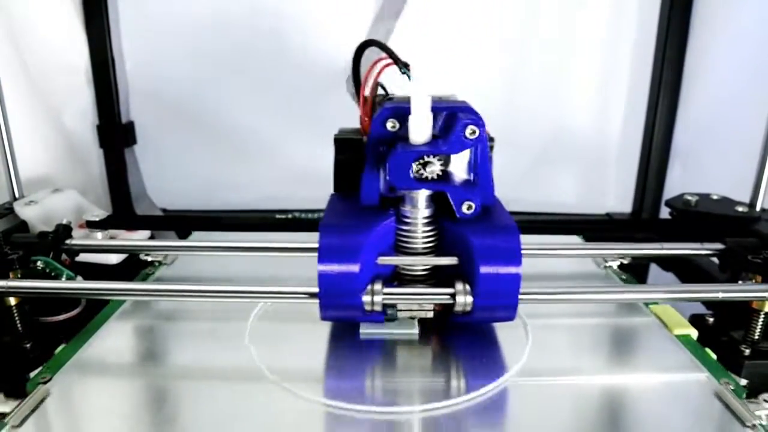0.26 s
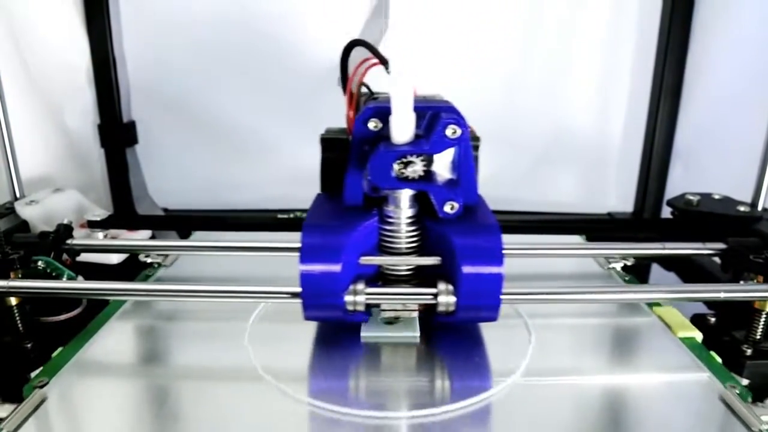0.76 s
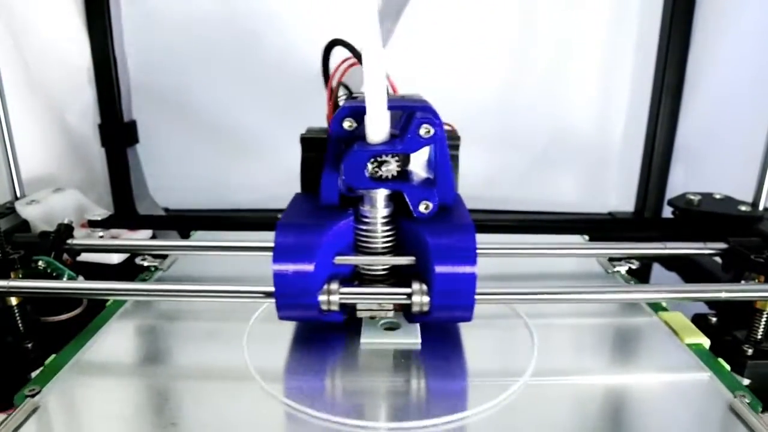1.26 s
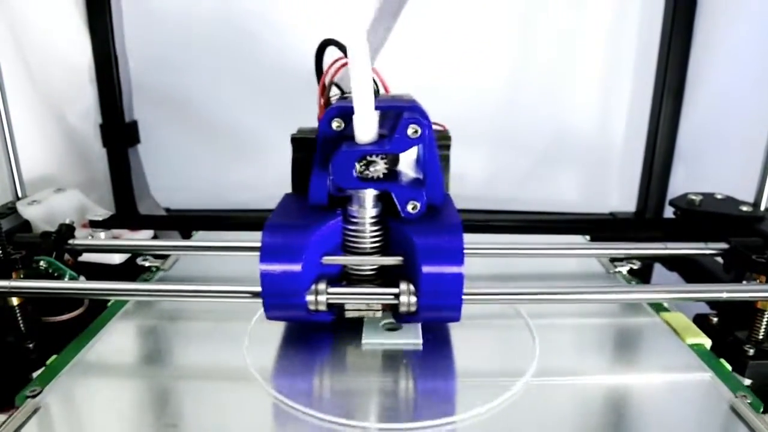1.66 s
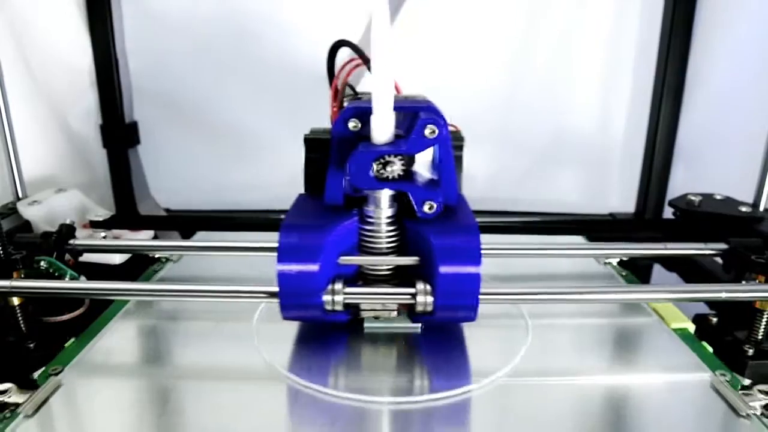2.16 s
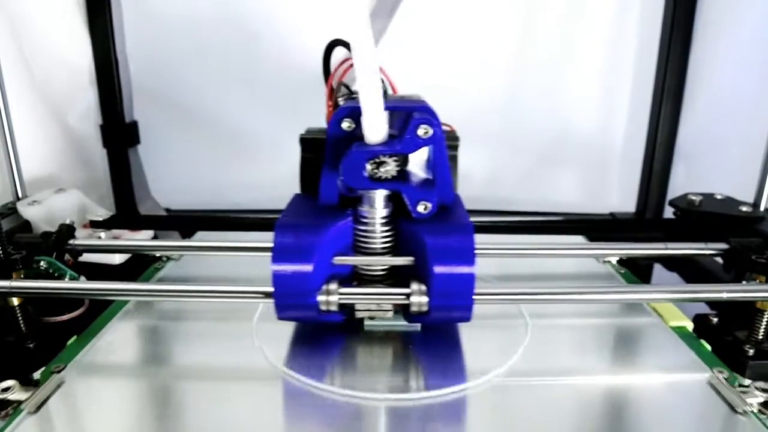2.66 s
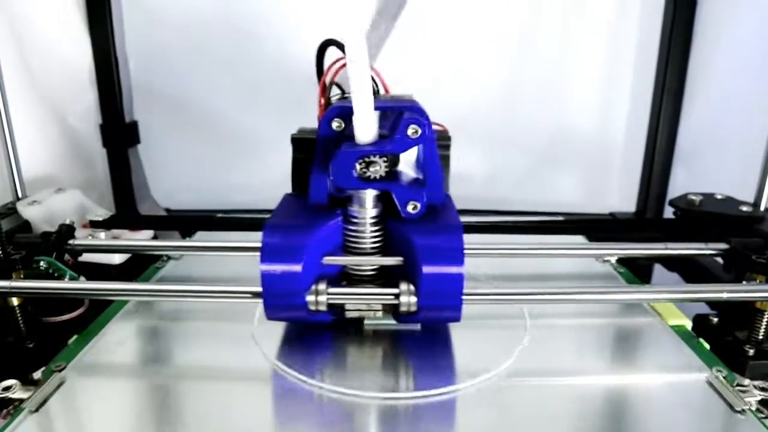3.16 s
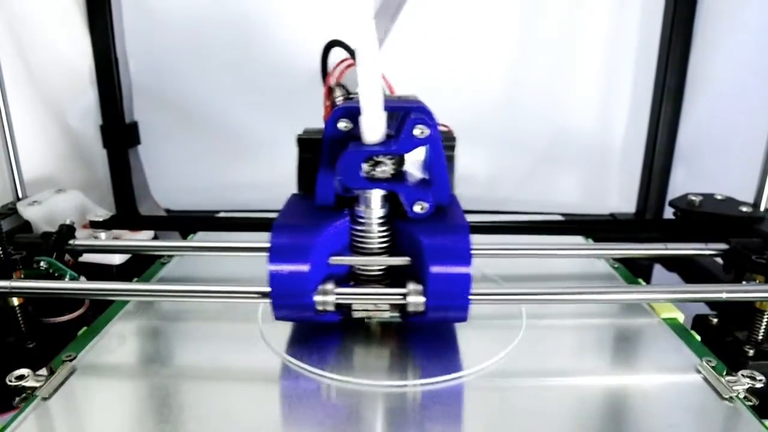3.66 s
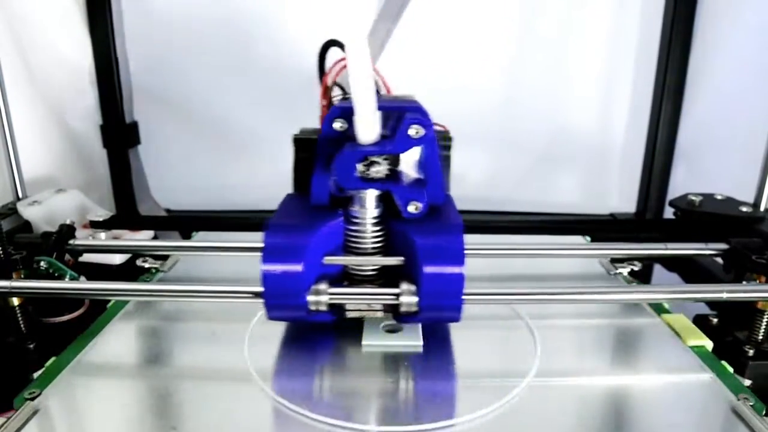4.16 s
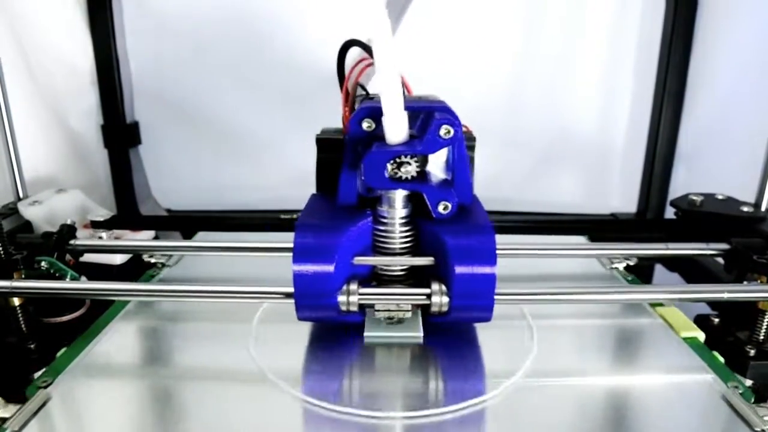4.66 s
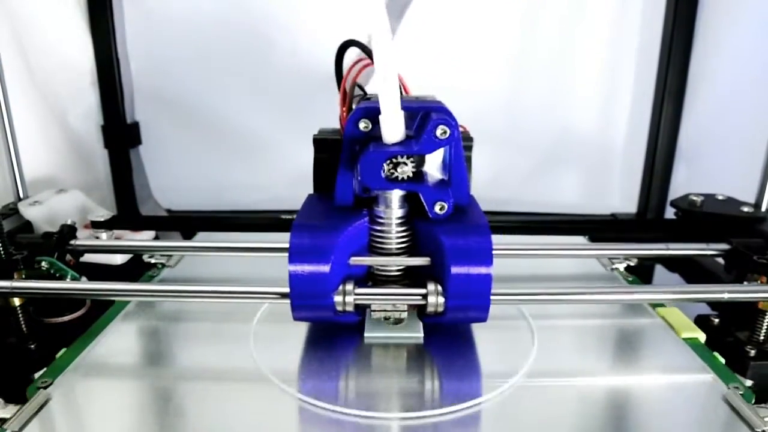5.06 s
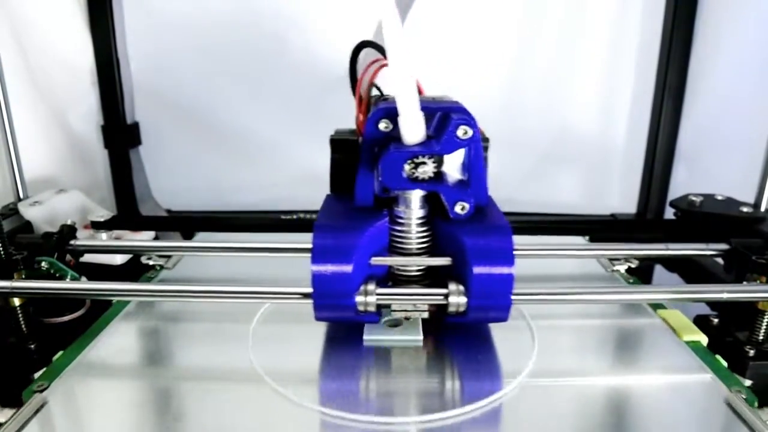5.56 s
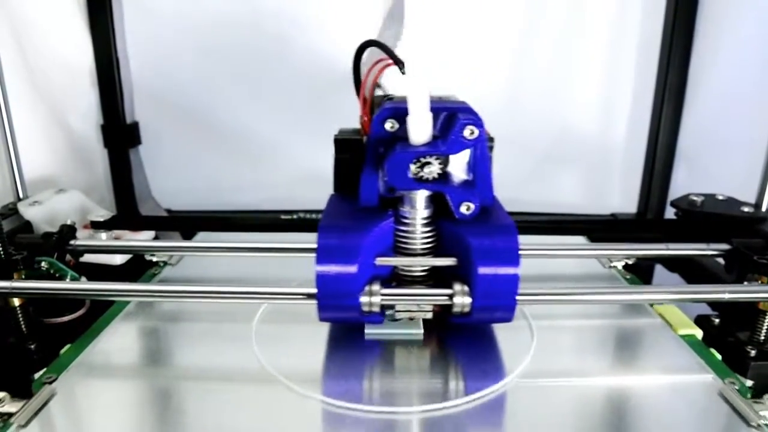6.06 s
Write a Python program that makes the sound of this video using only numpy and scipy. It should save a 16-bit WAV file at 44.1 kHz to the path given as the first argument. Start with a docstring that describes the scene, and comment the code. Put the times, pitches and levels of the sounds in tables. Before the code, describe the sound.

A small printing machine hisses and whirs while its moving head snaps loudly, ticks, squeaks faintly and softly knocks the frame in a small room.

```python
"""Desktop 3D printer at close range

Stick-slip excites the print head: hard plastic snaps, flurries of rattles and rising squeaks.
Soft knocks jolt the frame, stepper motors whir in spurts, and jerky motion sways the frame near 49 Hz.
Belts and bearings rush as noise shaped by resonances; fans add steady hiss, whine and table rumble.
A small room answers the contacts, and the camera's limiter ducks the whole machine after loud hits."""
import sys
import numpy as np
from scipy import signal
from scipy.fft import rfft, irfft, next_fast_len
from scipy.io import wavfile
from scipy.ndimage import uniform_filter1d, minimum_filter1d

SR = 44100
rng = np.random.default_rng(int(sys.argv[2]) if len(sys.argv) > 2 else 0)


def to_wav(s):
    """Save 16-bit WAV."""
    ch = np.atleast_2d(s).T  # columns
    pcm = np.round(np.clip(ch, -1, 1) * 32767)  # PCM
    wavfile.write(sys.argv[1], SR, pcm.astype(np.int16))


N = 278271

# colour of light contacts: f/Hz, relative level/dB
CONTACT_COLOUR = [(300, -17), (1500, -12.5), (3000, -6.5), (4500, -2.5), (6000, -2), (7400, -2), (8100, -2),
                  (9100, 0), (9750, 3.5), (10600, -4.5), (11800, -4), (13000, -14), (15500, -16)]
# rush of belts and bearings: t/s, relative level/dB
TRAVEL_LEVEL = [(0, -36), (1.2, -35.5), (1.74, -33.5), (2.1, -36), (3.6, -34), (3.8, -37.5), (4.8, -34.5),
                (5.5, -34.5), (5.75, -37.5), (6.31, -34)]
# resonances of panels and rods: f/Hz, width/Hz, relative level/dB
FRAME_MODES = [(434, 45, -3.5), (561, 38, -2.5), (942, 100, 0), (1148, 155, -1), (1256, 113, 1.5),
               (1408, 40, 2.5), (1646, 43, -0.5), (1995, 50, 3), (2354, 127, 3.5), (2560, 263, 4),
               (2730, 560, -1), (3430, 225, 1), (4450, 390, -1), (5390, 400, -3), (6290, 670, 0.5),
               (6810, 530, 1.5), (7530, 120, 1), (8740, 490, -0.5), (9180, 150, 4.5), (9750, 420, -11)]


def amp(db):
    """A level in decibels is a logarithmic amplitude ratio; return the ratio."""
    return 10 ** (np.asarray(db) / 20)


def unit(x):
    """Normalisation: equal mean power gives rms 1."""
    return x / np.sqrt(np.mean(x ** 2) + 1e-20)


def along(points, hz):
    """Spectral envelope: (f/Hz, value) points joined on a logarithmic frequency axis."""
    f, value = np.transpose(points)
    return np.interp(np.log(hz + 1), np.log(f + 1), value)


def curve(rows):
    """Slow modulation: (t/s, value) points joined by straight lines, one value per sample."""
    s, value = np.transpose(rows)
    return np.interp(np.arange(N) / SR, s, value)


def wobble(rate):
    """Band-limited random modulation, with the given number of knots a second."""
    count = int(N * rate / SR) + 4
    fine = signal.resample(rng.standard_normal(count), 8 * count)
    return np.interp(np.arange(N) * 8 * rate / SR, np.arange(len(fine)), fine)


def filtered(x, response):
    """Linear filtering: the spectrum is multiplied by a complex response of frequency."""
    size = next_fast_len(len(x) + 4096)
    f = np.fft.rfftfreq(size, 1 / SR)
    return irfft(rfft(x, size) * response(f), size)[:len(x)]


def body(modes, f):
    """Modal superposition: causal resonances (f/Hz, width/Hz, level/dB) sum with alternating signs."""
    total = 0
    for k, (centre, width, db) in enumerate(modes):
        resonance = 1j * f * width / (centre * centre - f * f + 1j * f * width)
        total = total + (-1) ** k * amp(db) * resonance
    return total


def lag(f, delay):
    """Dispersion: group delay grows with frequency and reaches delay/s at 10 kHz."""
    return np.exp(-1j * np.pi * delay * f ** 2 / 10 ** 4)


def tone(hz):
    """Frequency modulation: a sine's phase is the running integral of its frequency."""
    return np.sin(2 * np.pi * (np.cumsum(hz) / SR + rng.random()))


def add(track, s, db, hit):
    """Equal energy: mix in a hit with the energy of the given level held for 4 ms."""
    part = track[max(round(s * SR), 0):][:len(hit)]
    scaled = amp(db) * hit * np.sqrt(.004 * SR / np.sum(hit ** 2))
    part += scaled[:len(part)]


def scrape(length, tail_db, tail_t60, size=3000):
    """Slipping friction: the force is a short swell of micro-impacts, then dying chatter."""
    t = np.arange(size) / SR
    swell = t / length * np.exp(-2 * (t / length) ** 2)
    chatter = amp(tail_db - 60 * t / tail_t60) * (1 - np.exp(-t / length))
    return (swell + chatter) * rng.standard_normal(size)


def snaps():
    """Stick-slip: a stuck part lets go with one blow and rubs on; the treble rings last."""
    # hard snaps of the print head: t/s, relative level/dB, bite near 5.7 kHz/dB
    snap_rows = [(0.0341, -9, 0.5), (0.2269, -6.5, 1.5), (0.4674, -5, 0.3), (0.7605, -4.5, -1.5),
                 (1.107, -4.5, -2), (1.3137, -4, -3.5), (1.5108, -4.5, -3), (5.3953, -7, 0),
                 (5.6024, -6.5, 3)]
    # resonances of the print head: f/Hz, width/Hz, relative level/dB
    head_modes = [(1964, 98, -9), (2540, 140, -8), (2770, 170, -8.5), (3170, 400, -16), (4220, 250, -7.5),
                  (4400, 260, -8), (4900, 290, -9), (5480, 170, -6), (5810, 560, -6), (6650, 250, -1),
                  (6630, 180, -3), (7500, 220, -1), (8750, 220, -0.5), (9270, 460, -4), (10720, 360, -9.5),
                  (11500, 470, -13), (11900, 530, -15), (13700, 400, -27), (15500, 700, -35)]
    crack_modes = [(784, 1100, -4.5), (5900, 3900, 0.5)]  # f/Hz, width/Hz, relative level/dB
    out = np.zeros(N)
    t = np.arange(SR // 100) / SR
    for s, db, bite_db in snap_rows:
        rub = unit(scrape(length=0.003, tail_db=-19, tail_t60=0.027))
        blow = unit(signal.unit_impulse(len(rub), 8))
        ring = filtered(blow + amp(-7) * rub, lambda f: body(head_modes, f) * lag(f, delay=0.00157))
        crack_force = scrape(length=0.002, tail_db=-17.5, tail_t60=0.041)
        crack = filtered(crack_force, lambda f: body(crack_modes, f))
        bite = lambda f: amp(bite_db * np.exp(-((f - 5700) / 1600) ** 2))
        add(out, s - .0003, db + .5, filtered(unit(ring) + amp(-5.5) * unit(crack), bite))
        # a faint noise swells exponentially up to the blow
        lead_in = np.exp(t / 0.0011) * rng.standard_normal(len(t))
        add(out, s - t[-1], db - 30.0, filtered(lead_in, lambda f: body(head_modes, f)))
    return out


def ticks():
    """Impact excitation: light contacts rattle through a dispersive frame, each with a ring near 7 kHz."""
    # loudest rattles: t/s, relative level/dB, scrape length before scaling/s, brightness/(dB per octave)
    tick_rows = [(.4267, -27, 0.0025, 2), (.935, -23.5, .003, 3), (1.411, -23, .003, -5.5),
                 (1.718, -17, 0.0026, -3.5), (1.9404, -26.5, .003, 0), (2.028, -25.5, .004, 0.5),
                 (2.2407, -20, .0035, -1), (2.2761, -26, 0.0041, 3), (2.401, -22.5, 0.0045, 2.5),
                 (2.5124, -24, 0.0033, -5.5), (2.5356, -23.5, 0.0058, -5), (2.6884, -26, 0.0038, 1),
                 (2.8596, -23, 0.0043, -6.5), (2.9865, -25, 0.0035, -6), (3.1094, -24, 0.0051, -8),
                 (3.329, -20.5, 0.0053, -5), (3.3988, -28, .007, 0), (3.5757, -17, .003, 0.5),
                 (3.585, -19, 0.0052, -2), (3.6353, -20, 0.0043, -3.5), (3.644, -16.5, .004, 1.5),
                 (3.981, -25, .0036, 3), (4.103, -22.5, 0.0031, 5), (4.6956, -29, .0023, 4),
                 (4.7979, -22.5, .0035, 0), (4.8318, -17.5, .005, 4), (5.0154, -24.5, 0.0059, -4),
                 (5.0555, -21, 0.004, 2.5), (5.095, -27, 0.0028, -1), (5.155, -20.5, 0.0042, 3),
                 (5.2785, -23.5, .005, -8), (5.3202, -25, 0.0036, 4.5), (5.4994, -25, 0.0073, 5),
                 (5.712, -17, 0.0081, 2), (5.8027, -18, 0.0058, -0.5), (5.818, -21, 0.0042, -4),
                 (5.825, -20, 0.0073, -4.5), (5.9175, -19.5, 0.0043, 1.5), (5.954, -25.5, .003, 3),
                 (5.999, -19, 0.0092, 0.5), (6.0233, -24, .007, 3), (6.1116, -18, .003, 3),
                 (6.1359, -22.5, 0.0021, 6), (6.268, -21, 0.0064, 3)]
    ring_centre_hz, ring_width_hz, ring_db = 7120, 550, 4.5
    out, size = np.zeros(N), 4096
    f = np.fft.rfftfreq(size, 1 / SR)
    frame = amp(along(CONTACT_COLOUR, f)) * (1.4 + np.abs(body(FRAME_MODES, f))) * lag(f, delay=0.001188)
    octaves = np.log2(np.clip(f, 2000, 12000) / 7000)
    for s, db, length, bright_db in list(tick_rows) + faint_rattles():
        force = scrape(length=max(length * .9, 1 / 1000), tail_db=-14, tail_t60=.04)
        force = np.pad(force, (SR // 500, 0))
        ring_hz = ring_centre_hz * (1 + 0.043 * rng.standard_normal())
        ring_colour_db = ring_db * np.exp(-((f - ring_hz) / ring_width_hz) ** 2)
        colour = amp(bright_db * octaves + ring_colour_db)
        add(out, s - .0026, db + .5, irfft(rfft(force, size) * frame * colour))
    return out


def faint_rattles():
    """Stratified randomness: one faint rattle falls at a random moment of each equal time slot."""
    # flurries of faint rattles: start t/s, end t/s, rattles per second
    flurry_rows = [(0.332, .68, 13), (1.799, 2.5, 22), (2.95, 3.76, 15.4), (4.552, 5.3, 7),
                   (5.852, 6.3, 11.7)]
    faint_db, spread_db, length_s = -28, 1, 0.0044
    bright_db, bright_spread_db = .5, 1.5  # dB per octave
    rows = []
    for start, end, rate in flurry_rows:
        slots, chance = rng.random(32), rng.standard_normal((32, 2))
        for k, (slot, (loud, bright)) in enumerate(zip(slots, chance)):
            s = start + (k + slot) / rate
            if s < end:
                rows.append((s, faint_db + spread_db * loud, length_s, bright_db + bright_spread_db * bright))
    return rows


def squeaks():
    """Frequency glide: rough little whistles climb for a few milliseconds."""
    # squeaks: t/s, relative level/dB
    squeak_rows = [(.9378, -17), (2.0467, -22), (2.8145, -17), (2.9886, -15), (3.0884, -15), (3.2321, -15),
                   (3.3139, -28), (3.4236, -20), (4.5785, -15)]
    out, t = np.zeros(N), np.arange(SR // 80) / SR
    for s, db in squeak_rows:
        start_hz = 11500 * (1 + 0.051 * rng.standard_normal())
        hz = start_hz + 2600 * (1 - np.exp(-t / 0.0036))
        rough_hz = hz + 1500 * rng.standard_normal(len(t))
        phase = np.cumsum(rough_hz) / SR
        swell = t * np.exp(-(t / 0.0019) ** 2)
        add(out, s, db - 15.5, swell * np.sin(2 * np.pi * phase))
    return out


def crackle():
    """Random point process: faint contacts come denser when the carriage runs hard."""
    travel_db = curve(TRAVEL_LEVEL)
    per_second = 40 * amp(travel_db - travel_db.max())
    strength = amp(np.clip(2 * rng.standard_normal(N), -4, 4))
    contacts = (rng.random(N) < per_second / SR) * strength
    t = np.arange(SR // 80) / SR
    pulse = t / .0015 * np.exp(-t / 0.0014)
    force = signal.fftconvolve(contacts, pulse)[:N] * rng.standard_normal(N)
    # the contacts are soft, so the treble falls away above about 11 kHz
    colour = lambda f: amp(along(CONTACT_COLOUR, f)) / (1 + (f / 11500) ** 8)
    return amp(-44.5) * unit(filtered(force, colour))


def knocks():
    """Modal excitation: the carriage jolts the low modes of the frame as it turns round."""
    # soft knocks: t/s, level over 4 ms/dB
    knock_rows = [(0.998, -34), (1.274, -38), (1.593, -32), (1.798, -32), (3.603, -34.5), (3.637, -33.5),
                  (4.81, -32.5), (5.665, -27.5), (6.157, -32.5)]
    # modes that a knock excites: f/Hz, width/Hz, relative level/dB
    knock_modes = [(195, 45, 1.5), (312, 77, 5.5), (454, 60, 7), (650, 180, -4), (1300, 400, -38),
                   (2400, 370, -26)]
    out = np.zeros(N)
    for s, db in knock_rows:
        force = scrape(length=0.0022, tail_db=-19, tail_t60=0.13)
        add(out, s, db, filtered(force, lambda f: body(knock_modes, f)))
    return out


def steppers():
    """Beating: two motor tones whir together; moves and zigzag turns swell at their step rates."""
    # the whir between spurts: step rate f/Hz, relative level/dB
    drone_rows = [(323, -0.5), (356, -1.5)]
    # how hard the motors run: t/s, relative level/dB
    drive_rows = [(0, -51), (.45, -49.5), (.8, -53.5), (1.25, -49.5), (1.7, -54), (3, -56), (3.7, -54.5),
                  (4.1, -55), (4.6, -52), (6.31, -52.5)]
    # stretches where the drone drops, overlaps adding up: start t/s, end t/s
    stop_rows = [(3.77, 4.2), (4.13, 4.23)]
    # single motor moves: middle t/s, relative level/dB, nominal step rate f/Hz, half length/s
    move_rows = [(0.638, -45, 356, .04), (0.944, -47, 348, .05), (1.423, -35, 336, 0.022),
                 (1.84, -47, 331, .035), (1.936, -43, 354, .033), (2.02, -45.5, 367, .035),
                 (2.133, -43.5, 360, 0.036), (3.43, -50, 358, .05), (3.65, -44, 329, .05),
                 (3.897, -43, 328, .022), (3.931, -47, 362, .09), (4.3, -45.5, 361.4, 0.089),
                 (4.512, -41, 321, .022), (4.545, -44, 440, 0.019), (4.663, -44, 441, .022),
                 (4.686, -43, 353, .05), (4.736, -42.5, 432, .03), (4.838, -40.5, 365, .035),
                 (4.97, -44, 403, .022), (4.988, -37, 319.5, 0.024), (5.26, -45.5, 326, .08),
                 (5.386, -44, 356, 0.056), (5.514, -44.5, 326, .08), (5.673, -47, 449, .022),
                 (5.94, -45, 328, 0.08), (6.11, -47, 357.4, .08)]
    t = np.arange(N) / SR
    stops = sum(1.0 * ((t > start) & (t < end)) for start, end in stop_rows)
    drive_db = curve(drive_rows) - 15 * uniform_filter1d(stops, size=900)
    out = np.zeros(N)
    for hz, db in drone_rows:
        level = amp(drive_db + db + 3.5 + 1.7 * wobble(18))
        out += level * tone(hz * (1 + 0.0121 * wobble(25)))
    for s, db, hz, half in move_rows:
        add_whir(out, s, db, hz, half, climb=0)
    for s in zigzag(count=12):
        add_whir(out, s, db=-41, hz=347.4, half=.026, climb=0.0306)
    return out


def add_whir(track, s, db, hz, half, climb):
    """Step-rate ramp: a move swells, speeds up and slows; climb tilts it as a share of the rate."""
    at = np.arange(max(int((s - 3 * half) * SR), 0), min(int((s + 3 * half) * SR), N))
    u = (at / SR - s) / half
    step_hz = hz * (1 + 0.01234 * (.3 - u ** 2) + climb * u)
    track[at] += amp(db + 2.0) * np.exp(-u ** 2) * tone(step_hz)


def zigzag(count):
    """Arithmetic progression: filling a corner, each stroke is shorter by the same step."""
    start_s, first_stroke_s, shrink_s = 2.317, .182, .013
    k = np.arange(count)
    return start_s + first_stroke_s * k - shrink_s * k * (k - 1) / 2


def sway():
    """Transient response: jerky motion rocks the lowest frame mode, which builds up and dies away."""
    # bouts of jerky motion: start t/s, length/s, relative level/dB
    rocking_rows = [(0.103, .13, -50), (0.403, 0.066, -46.5), (.99, .09, -53), (1.709, 0.13, -44),
                    (2, 0.44, -51), (2.753, 0.71, -49), (3.654, 0.11, -43.5), (4.54, 0.27, -56),
                    (4.79, 0.28, -43), (5.33, .28, -48.5), (5.806, .22, -46), (6.117, 0.21, -48.5)]
    rest_db, rise_s, fall_s = -56.5, 0.011, .05  # rest level is relative, as in the table
    t = np.arange(N) / SR
    power = amp(rest_db) ** 2
    for s, length, db in rocking_rows:
        rise = 1 - np.exp(-np.maximum(t - s, 0) / rise_s)
        fall = np.exp(-np.maximum(t - s - length, 0) / fall_s)
        power = power + (amp(db) * rise * fall) ** 2
    return np.sqrt(power) * amp(5.5 + 1.7 * wobble(15)) * tone(49 * (1 + 0.028 * wobble(13)))


def carriage():
    """Forced vibration: the fine grain of belts and bearings sounds through the frame's resonances."""
    grain = rng.standard_normal(N) * amp(1.84 * wobble(900) + 1.2 * wobble(45))
    treble_cut = lambda f: 1 / np.sqrt(1 + (f / 10500) ** 16)
    rush = unit(filtered(grain, lambda f: body(FRAME_MODES, f) * treble_cut(f)))
    return amp(curve(TRAVEL_LEVEL) - 0.5) * rush


def fans():
    """Broadband and tonal noise: steady air and table rumble under slightly unsteady tones."""
    # air noise: f/Hz, relative level/dB
    air_colour = [(60, -24), (110, -12.5), (220, -14), (340, -6.5), (650, -10), (1300, -3.5), (1800, -5),
                  (3600, -8.5), (6000, -8.5), (7200, -5.5), (8100, -10.5), (9500, -8), (10800, -18.5),
                  (15500, -24)]
    # the table under the printer: f/Hz, relative level/dB
    rumble_colour = [(10, -6), (25, -2), (45, -2), (70, -10.5), (100, -11), (200, -44), (1000, -100)]
    # mains hum and fan tones: f/Hz, relative level/dB
    whine_rows = [(120, -59), (1297, -50.5), (3430, -54.5), (3731, -57), (7467, -49.5), (12242, -75)]
    air = unit(filtered(rng.standard_normal(N), lambda f: amp(along(air_colour, f))))
    rumble = unit(filtered(rng.standard_normal(N), lambda f: amp(along(rumble_colour, f))))
    whine = np.zeros(N)
    for hz, db in whine_rows:
        whine += amp(db + 2 + 2.2 * wobble(5.1)) * tone(hz * (1 + 0.000976 * wobble(12)))
    return amp(-34.0 + 0.67 * wobble(11)) * air + amp(-53.5) * rumble + whine


def room(x):
    """Reverberation: a small room's diffuse tail decays at a rate that depends on frequency."""
    # reverberation time: f/Hz, T60/s
    decay_times = [(200, 0.06), (2000, 0.12), (8000, 0.054), (15000, 0.063)]
    hz, t, noise = signal.stft(rng.standard_normal(SR // 3), SR, nperseg=256)
    decay = amp(-60 * t / along(decay_times, hz)[:, None])
    tail = signal.istft(noise * decay, SR, nperseg=256)[1]
    tail = np.pad(tail / np.linalg.norm(tail), (SR // 250, 0))  # arrives 4 ms late
    return signal.fftconvolve(x, tail)[:N]


def scene():
    """Superposition: all sources and the room's answer to the contacts, the same in both channels."""
    hits = snaps() + ticks() + squeaks() + crackle() + knocks()
    mono = hits + amp(-12) * room(hits) + fans() + carriage() + steppers() + sway()
    return np.array([mono, mono])


def limiter(x, ceiling_db, hold, release_db_per_s):
    """Gain reduction: gain drops fast when the level passes the ceiling, holds, then climbs back."""
    power = uniform_filter1d(x[0] ** 2, size=176)  # over 4 ms
    level_db = 10 * np.log10(np.abs(power) + 1e-12)
    span = int(hold * SR) | 1
    # the shifted window looks back, so each drop is held
    held_db = minimum_filter1d(np.minimum(ceiling_db - level_db, 0), span, origin=span // 2)
    climb = release_db_per_s * np.arange(N) / SR
    gain_db = np.minimum.accumulate(held_db - climb) + climb
    return x * amp(uniform_filter1d(gain_db, size=32))


def record(dry):
    """Saturation and band limiting: the camera limits, rounds off peaks and cuts the top treble."""
    top_hz = 15800
    x = limiter(dry, ceiling_db=-12.0, hold=0.029, release_db_per_s=40.5)
    x = x / (1 + np.abs(x / .72) ** 6) ** (1 / 6)
    return np.array([filtered(channel, lambda f: f < top_hz) for channel in x])


dry = scene()
out = record(dry)
to_wav(out)
```